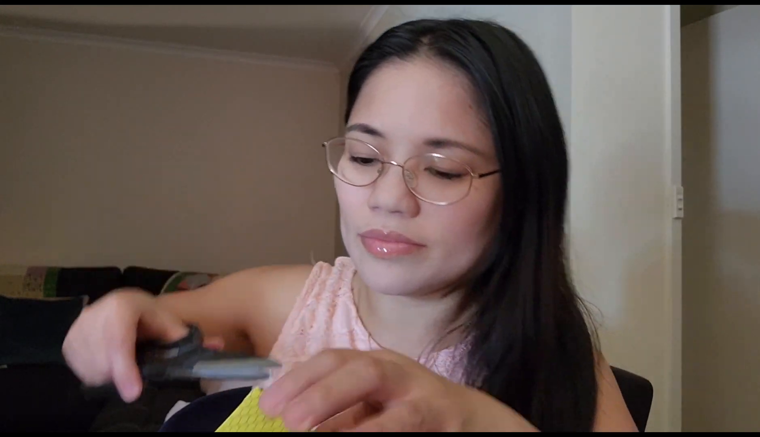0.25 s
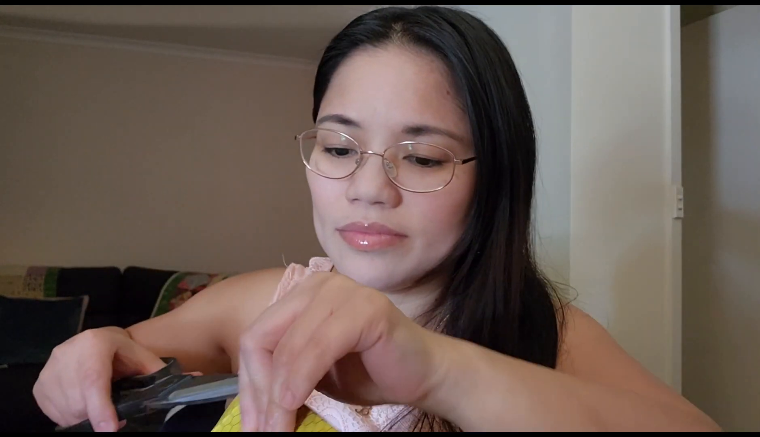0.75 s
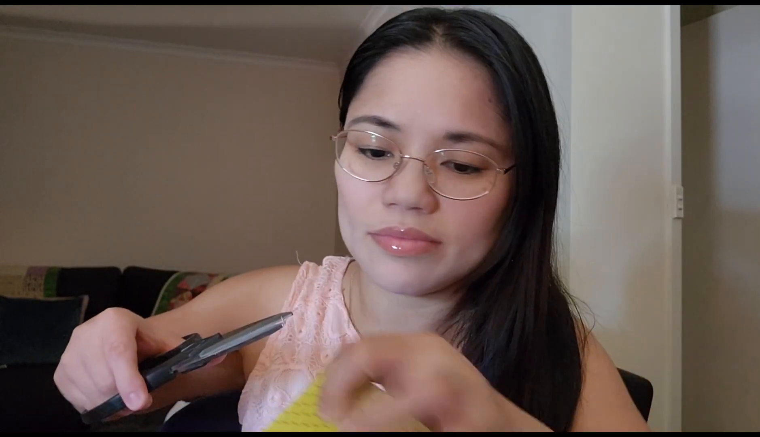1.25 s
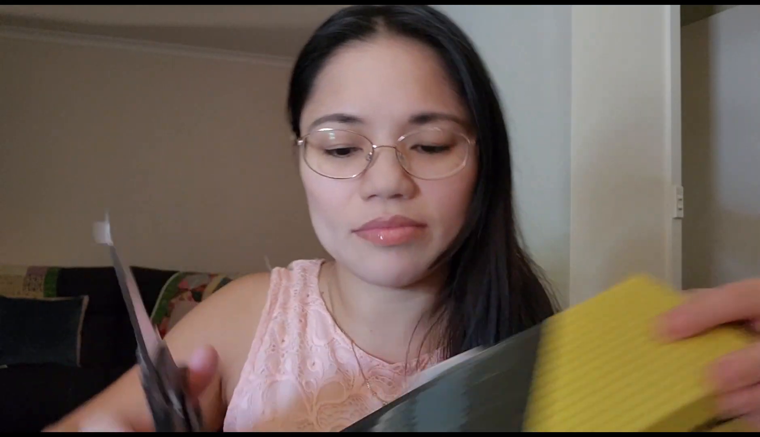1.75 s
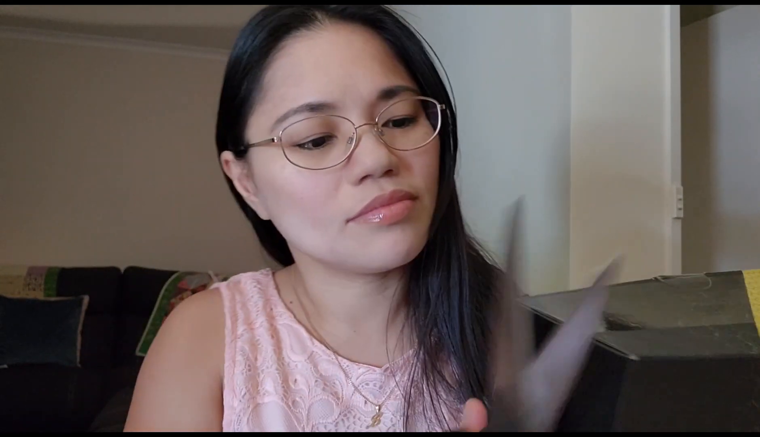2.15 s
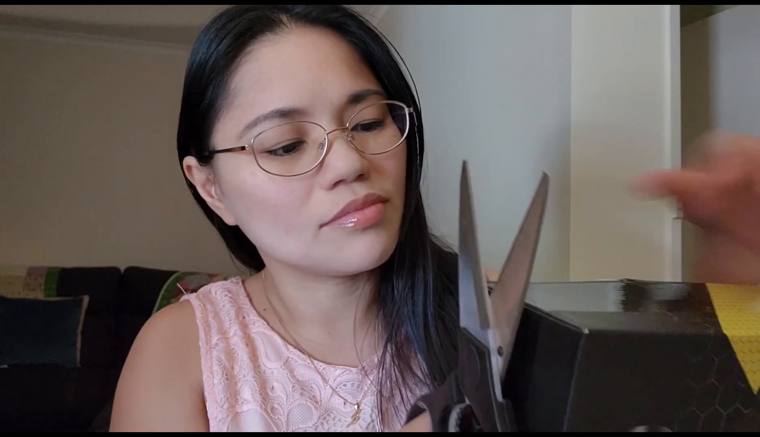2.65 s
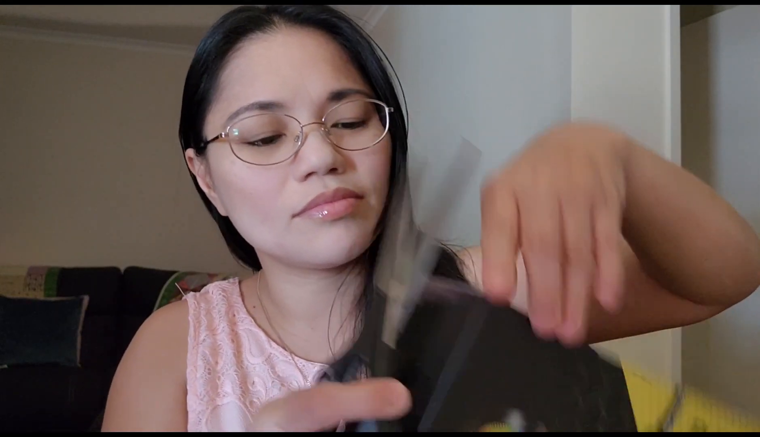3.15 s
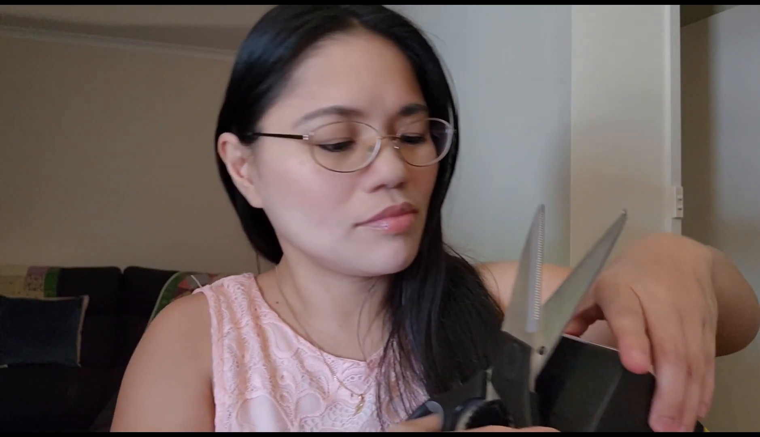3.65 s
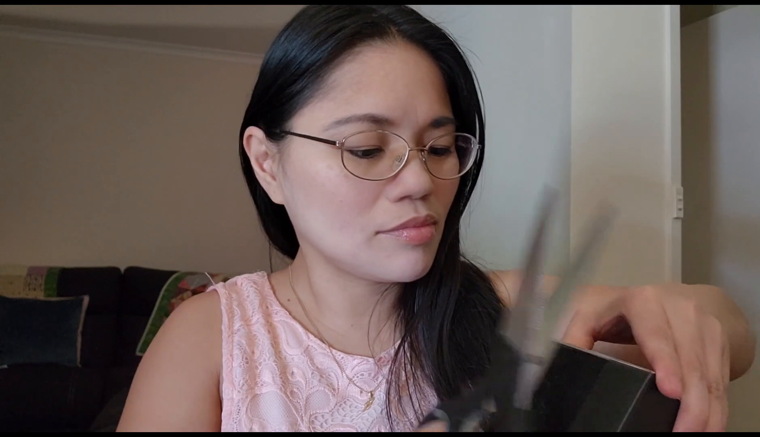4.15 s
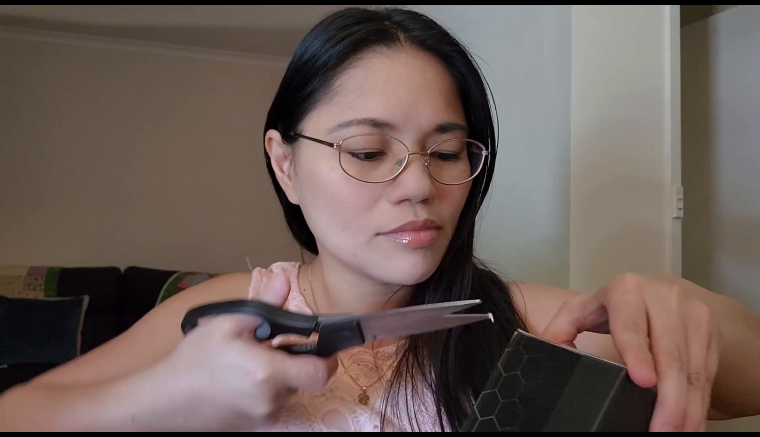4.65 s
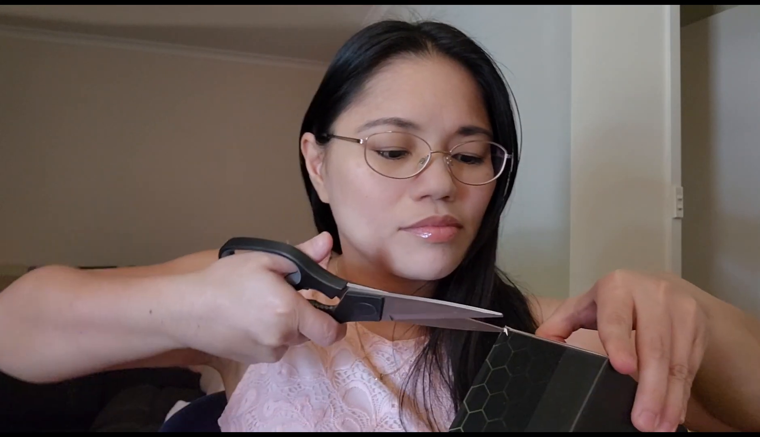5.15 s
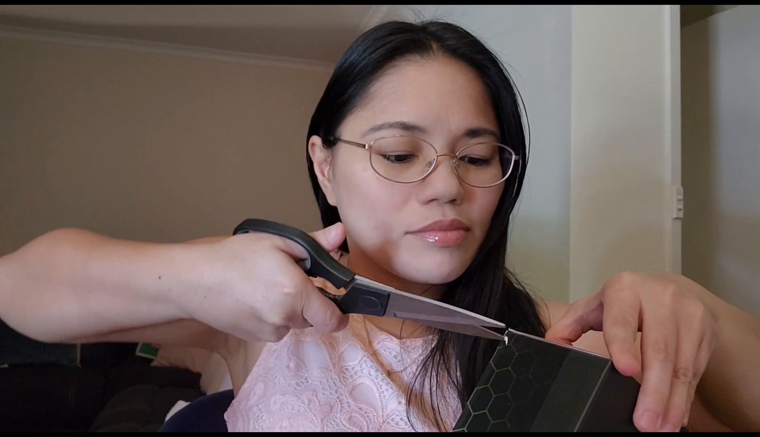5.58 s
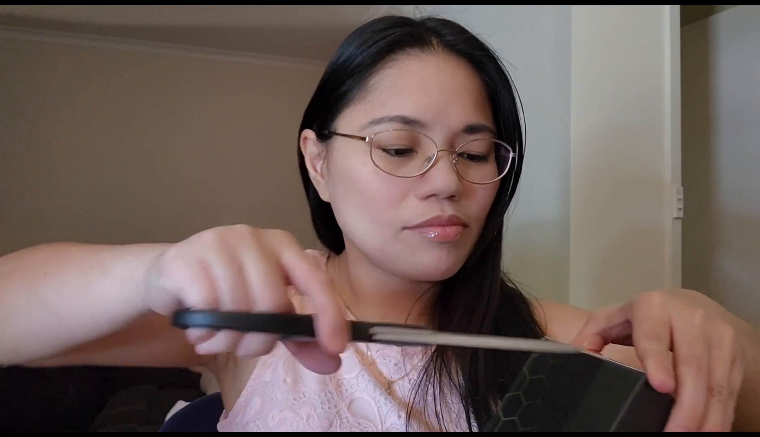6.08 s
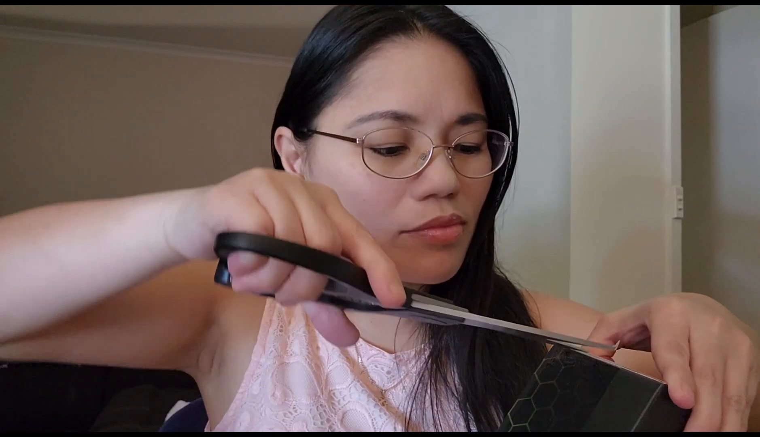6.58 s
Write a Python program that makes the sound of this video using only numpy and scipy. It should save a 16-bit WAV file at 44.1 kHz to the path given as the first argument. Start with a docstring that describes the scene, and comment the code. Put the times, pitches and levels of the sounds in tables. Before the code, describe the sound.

A close stereo microphone in a small, fairly dry room with steady soft noise. At 0 s blades grind faintly with a light tap; a hollow knock and tick come at 0.5, then low cardboard rubbing swells. At 1.3 a loud sharp snap of card and steel bursts out, the strongest hit. Quick rubs and papery hiss run from 1.5 to 2.2. At 2.25 the box lands with a hollow knock and bright metal tick; at 2.5 a deep table boom and rough skid, at 2.7 a shorter, weaker skid. Fingers slide and tap lightly until 3.3, thinning out, with small knocks and a faint blade scrape around 3.9 to 4.4. Then near quiet: soft dull knocks at 5.2 and 5.45, a faint rub at 6.0, barely audible ticks. Low rumble swells from about 5.2, strongest at the end.

```python
"""Scissors work at a taped cardboard box, close to the microphone in a small quiet room with steady noise.
First, blades grind and card rubs (grains through ringing modes); blows, damped sines with noise, snap a seam.
The box is turned, set down and shoved twice: steel ticks, the table booms and coarse slips make the skids.
Then fingers tap and slide on the card and the scissors look for the next seam.
Late on, a rumble of coloured noise swells; short echoes and a thin tail follow every near sound."""
import sys
import numpy as np
from scipy import signal
from scipy.fft import rfft, irfft
from scipy.io import wavfile
from scipy.ndimage import uniform_filter1d

SR = 44100
rng = np.random.default_rng(int(sys.argv[2]) if len(sys.argv) > 2 else 0)


def wav_record(signal):
    """Record a signal, one row per channel, as 16-bit PCM in the file named by sys.argv[1]."""
    frames = np.transpose(np.atleast_2d(signal))
    bounded = np.clip(frames, -1, 1)
    # unit amplitude maps onto the largest positive 16-bit level
    quanta = np.round(bounded * 32767).astype(np.int16)
    wavfile.write(sys.argv[1], SR, quanta)


N = 300806  # length in samples

# steady room noise with a shelf of hiss: f/Hz, relative density/dB per Hz
AIR_COLOUR = [(18, -11), (50, -4.5), (98, -19.5), (160, -14), (250, -12), (370, -16), (450, -16),
              (650, -27.5), (1400, -33), (2500, -37.5), (6000, -45.5), (8300, -44), (9200, -56.5),
              (15500, -54.5)]
# late low rumble: t/s, level/dB
RUMBLE_SWELL = [(0, -91.5), (4.898, -74.5), (5.399, -61), (6.3, -64.5), (6.55, -57), (6.82, -54)]
# spectrum of that rumble: f/Hz, relative density/dB per Hz
RUMBLE_COLOUR = [(20, -15.5), (42, 0), (58, 0), (90, -8.5), (135, -8), (260, -12), (500, -42.5),
                 (1200, -69)]
# likeness of left and right in the room noise: f/Hz, likeness/0-1
AIR_SAME = [(60, 0.6), (290, 0.9), (640, 0.4), (1400, 0), (15000, 0)]
# likeness of left and right in the rumble and the sliding sounds: f/Hz, likeness/0-1
NEAR_SAME = [(100, 1), (300, 0.98), (700, 0.097), (1500, 0.085), (3200, 0.13), (7000, 0.033)]
# card sliding under fingers and blades, one swell a stroke:
# start t/s, hardest t/s, end t/s, panel flexing level/dB, rub level/dB, hiss level/dB
STROKES = [(0.22, 0.3, 0.44, -77, -73, -71.5), (0.615, 0.674, 0.76, -66, -58.5, -78),
           (0.647, 0.763, 0.87, -56.5, -59.5, -90), (0.81, 1.032, 1.13, -60.5, -58, -70.5),
           (1.193, 1.255, 1.29, -55.5, -56.5, -75.5), (1.262, 1.3, 1.41, -47.5, -49, -57),
           (1.48, 1.644, 1.70, -58, -55, -68), (1.653, 1.753, 1.82, -55, -56.5, -55.5),
           (1.809, 1.83, 1.915, -51.5, -50.5, -57.5), (1.89, 1.937, 1.965, -64, -56, -57.5),
           (1.935, 1.987, 2.04, -51.5, -56.5, -66), (2.005, 2.053, 2.21, -63, -66.5, -64.5),
           (2.32, 2.398, 2.46, -54.5, -58.5, -69.5), (2.435, 2.48, 2.55, -65, -52, -55),
           (2.657, 2.665, 2.70, -55, -62, -61), (2.705, 2.756, 2.88, -66, -65.5, -70.5),
           (2.882, 2.94, 3.02, -68, -73, -67), (2.97, 3.068, 3.19, -65.5, -63.5, -65),
           (3.173, 3.174, 3.24, -59, -50, -66), (3.274, 3.328, 3.38, -60, -60, -71),
           (3.30, 3.42, 3.56, -71.5, -80, -75), (3.791, 3.847, 3.92, -74, -54.5, -76),
           (3.91, 4.002, 4.08, -70, -62.5, -61.5), (4.014, 4.052, 4.10, -78, -58.5, -61),
           (5.421, 5.652, 5.72, -79, -75, -80), (5.899, 6.03, 6.14, -67.5, -64, -98)]
# spectrum of the panels flexing: f/Hz, relative density/dB per Hz
FLEX_COLOUR = [(30, -18.5), (70, -1.5), (125, 4.5), (190, -4.5), (300, -26.5), (700, -52.5)]
# spectrum of the rub: f/Hz, relative density/dB per Hz
RUB_COLOUR = [(100, -37.5), (250, 0.5), (420, 2), (750, -9), (1600, -14), (2600, -17.5), (5000, -36.5),
              (12000, -59)]
# spectrum of the card's hiss: f/Hz, relative density/dB per Hz
HISS_COLOUR = [(500, -40), (1500, -1), (2500, -5), (3600, -2), (5500, -6.5), (6600, -11), (7900, -9.5),
               (9200, -18.5), (12000, -18), (15500, -22.5)]
# higher modes of the whole box: f/Hz, relative level/dB, t60/s
BOX_MODES = [(256, -6, 0.055), (440, -5.5, 0.046), (660, -15, 0.023), (790, -10, 0.025), (982, 0.5, 0.015),
             (1270, -10, 0.028), (1499, 1, 0.02), (1897, -4.5, 0.02), (2264, -9, 0.046), (2378, -8, .025),
             (3071, -21, .022), (3600, -14.5, 0.02), (3930, -15, 0.018), (4260, -19, 0.051),
             (5600, -20.5, .015)]
# how fast the room dies: f/Hz, t60/s
ROOM_DECAY = [(120, 0.48), (400, 0.45), (1200, 0.19), (4000, 0.22), (8000, .21), (15000, 0.037)]
# near echoes from table and body: delay t/s, gain/1
ECHOES = [(.0021, 0.19), (.0072, 0.13), (.0098, .1), (0.0128, 0.22)]
# blade slides on blade: start t/s, end t/s, level at the middle/dB
SHEARS = [(0.02, 0.132, -73.5), (3.964, 4.056, -73.5), (4.355, 4.405, -77)]
# scissor blade modes: f/Hz, relative level/dB
STEEL_MODES = [(3780, -2), (5650, -8), (6500, -9), (7280, -1), (7600, 2), (8270, -1.5), (9950, -14.5),
               (11250, -12.5), (12500, -11.5), (13800, -17.5)]
# blows on the box: t/s, pitch factor of the struck panel/1,
# thump level/dB, hollow body level/dB, clack level/dB, left over right/dB
KNOCKS = [(0.027, 1.2, -54, -74, -70.5, 4), (0.234, 0.85, -59.5, -61, -100, 0),
          (0.513, 1.02, -54.5, -42.5, -58, 3), (1.2899, 1.24, -40.5, -28, -26, 2.5),
          (1.635, 1.05, -76, -55.5, -58, 3), (1.668, 1.16, -59.5, -60.5, -63, 3),
          (1.75, 1.01, -74, -46, -54.5, 1), (2.2512, 1.005, -40, -26, -39, 1),
          (2.4575, 1.2, -46.5, -52.5, -57.5, 1), (2.4992, 0.8, -34.5, -35, -44.5, 0.5),
          (2.505, 0.97, -35.5, -47.5, -53, -4), (2.621, 1.23, -69, -56, -71.5, -4),
          (2.701, 1, -53, -50, -44.5, -1), (3.1553, 0.993, -52.5, -45, -54, -0.5),
          (3.206, 1.5, -52, -54.5, -58, -0.5), (3.276, 0.89, -53, -47.5, -59, 0.5),
          (3.914, 1.286, -49.5, -44, -47.5, -0.5), (3.9175, 1.58, -67, -47, -55, 10),
          (5.175, 1.68, -47, -49, -68.5, 1.5), (5.454, 1.02, -51.5, -47.5, -75, 1.5)]
# lowest modes of a panel, before the pitch factor: f/Hz, relative level/dB, t60/s
PANEL_MODES = [(124, -2.5, 0.07), (242.6, -5, 0.036), (295, -7.5, .04), (352, -1.5, 0.035),
               (540, -2.5, 0.039)]
# steel blades ticking: t/s, peak level before the left side is raised/dB
CLINKS = [(0.513, -43.5), (0.995, -51.5), (1.126, -59), (1.2902, -15.5), (2.2536, -18.5), (2.262, -37),
          (2.653, -53), (2.925, -57), (3.006, -55), (3.153, -49), (3.559, -56), (4.154, -57), (4.368, -50),
          (5.513, -64.5), (6.445, -67), (6.70, -64.5)]
# the table under the box answers a shove: t/s, level/dB
THUDS = [(2.248, -36), (2.385, -47), (2.411, -48), (2.504, -25), (2.699, -42.5)]
# table modes: f/Hz, relative level/dB, t60/s
TABLE_MODES = [(57.7, -7.5, 0.27), (77, 0, 0.034), (113.4, 2, .06)]
# the box skids under growing force until it stops:
# start t/s, hardest t/s, level at the hardest/dB, rise from the start/dB, fall time constant t/s
SKIDS = [(2.469, 2.497, -32.5, 44, 0.011), (2.64, 2.701, -35.5, 32.5, 0.01)]

AIR_DB = -64  # steady room noise
EDGE_DB, SWELL_POWER = 15.5, 1.5  # a stroke is this far down at start and end; the power rounds its top
# the hands never lie quite still while they turn the box: flexing, rub and hiss levels (dB)
HOLD_UNTIL_S, HOLD_DB = 4.15, (-75, -78.5, -81.5)
STEEL_T60 = .014  # s; hand and card damp all blade modes at once
# a blow with a clack of FIRM_DB touches for CONTACT_S; the touch doubles for every DOUBLING_DB below that
CONTACT_S, FIRM_DB, DOUBLING_DB = 0.00049, -40, 13.5
CRACK_DB = -16.5  # crack of the fibres, relative to the clack
MIC_LOW_HZ, EDGE_HZ = 29.8, 15500


def amp(db):
    """Decibels to gain."""
    return 10 ** (np.asarray(db) / 20)


def evened(x):
    """Scales to rms 1."""
    return x / np.sqrt(np.mean(x ** 2) + 1e-20)


def read(points, hz):
    """Reads a table on a log-frequency axis."""
    f, value = np.transpose(points)
    return np.interp(np.log(hz + 1), np.log(f + 1), value)


def add(mix, s, sound):
    """Adds a stereo sound at time s."""
    part = mix[:, max(round(s * SR), 0):][:, :sound.shape[1]]
    part += sound[:, :part.shape[1]]


def coloured(x, colour, same):
    """Gives a pair of signals a spectrum and a left-right likeness, at rms 1."""
    hz = np.fft.rfftfreq(N, 1 / SR)
    left, other = rfft(x)
    likeness = np.clip(read(same, hz), 0, 1)
    right = likeness * left + np.sqrt(1 - likeness ** 2) * other
    return evened(irfft(np.array([left, right]) * amp(read(colour, hz)), N))


def ring(modes, t):
    """Damped sines of a struck thing."""
    return sum(amp(db - 60 * t / t60) * np.sin(2 * np.pi * hz * t) for hz, db, t60 in modes)


def air():
    """Steady room noise and a slow late swell of rumble, both coloured noise."""
    steady = amp(AIR_DB) * coloured(rng.standard_normal((2, N)), AIR_COLOUR, AIR_SAME)
    swell = amp(np.interp(np.arange(N) / SR, *np.transpose(RUMBLE_SWELL)))
    return steady + swell * coloured(rng.standard_normal((2, N)), RUMBLE_COLOUR, NEAR_SAME)


def grains(per_s, spread_db):
    """Fibres catching and slipping: clicks of very uneven size, timed alike left and right."""
    size = amp(spread_db * np.minimum(rng.exponential(1, N), 4))
    fires = rng.random(N) < per_s / SR
    return size * fires * rng.standard_normal((2, N))


def through_box(x, share):
    """Part of a friction sound rings the box modes."""
    response = ring(BOX_MODES, np.arange(4096) / SR)
    body = signal.oaconvolve(x, response[None], axes=1)[:, :N]
    return evened(x) + share * evened(body)


def patchy(x, depth_db, wide=5, long=13):
    """As the contact point wanders, some resonances of the card swell and others fade."""
    z = signal.stft(x, SR, nperseg=512, noverlap=384)[2]
    drift = rng.standard_normal(z.shape[1:])
    for _ in range(2):
        drift = uniform_filter1d(drift, round(wide), 0)  # across frequency bins
        drift = uniform_filter1d(drift, round(long), 1)  # across time frames
    return signal.istft(z * amp(depth_db * evened(drift)), SR, nperseg=512, noverlap=384)[1][:, :N]


def strokes():
    """Sliding contact swells and eases: panels flex, the box hums with the rub, the coated card hisses."""
    t = np.arange(N) / SR
    flex = coloured(grains(600, 1.5), FLEX_COLOUR, NEAR_SAME)
    rub = patchy(through_box(grains(4400, 1.6), 0.098), depth_db=3.5, wide=3)
    rub = coloured(rub, RUB_COLOUR, NEAR_SAME)
    grit = evened(grains(6000, 2.1)) + .45 * evened(grains(130, 2.5))  # now and then an edge catches
    hiss = patchy(through_box(grit, 0.25), depth_db=3.5, wide=5)
    hiss = coloured(hiss, HISS_COLOUR, NEAR_SAME)

    hold = np.clip((HOLD_UNTIL_S - t) / 0.12, 0, 1)
    power = np.outer(amp(HOLD_DB) ** 2, hold)
    for start, top, end, *levels_db in STROKES:
        away = np.maximum((top - t) / (top - start), (t - top) / (end - top))  # 0 at the top, 1 at the ends
        on = away < 2
        swell = amp(-EDGE_DB * away[on] ** SWELL_POWER)
        power[:, on] += np.outer(amp(levels_db), swell) ** 2
    return sum(level * layer for level, layer in zip(np.sqrt(power), (flex, rub, hiss)))


def room(x, wet_db=-18.0, build_s=0.0066, side_s=.0003, size=22000):
    """A few near echoes and a thin diffuse tail in which each band dies at its own speed."""
    taps = rng.standard_normal((2, size)) * (rng.random((2, size)) < 4000 / SR)
    hz, t, z = signal.stft(taps, SR, nperseg=256)
    decay = amp(-60 * t / read(ROOM_DECAY, hz)[:, None])
    tail = signal.istft(z * decay, SR, nperseg=256)[1]
    tail *= np.clip(np.arange(tail.shape[1]) / SR / build_s - .5, 0, 1)
    tail *= amp(wet_db) / np.linalg.norm(tail[0])
    for delay, gain in ECHOES:  # the right side hears each echo side_s later
        tail[[0, 1], [round(delay * SR), round((delay + side_s) * SR)]] += gain
    return signal.fftconvolve(x, tail, axes=1)[:, :N]


def blade(t):
    """The brief ring of the steel: damped sines with one shared decay."""
    return ring([(hz, db, STEEL_T60) for hz, db in STEEL_MODES], t)


def shears():
    """Edge grinds along edge: a stream of grains keeps the steel sounding."""
    t = np.arange(N) / SR
    response = blade(np.arange(2048) / SR)
    steel = evened(signal.oaconvolve(grains(5800, 1.3), response[None], axes=1)[:, :N])
    level = np.zeros(N)
    for start, end, db in SHEARS:
        along = np.clip((t - start) / (end - start), 0, 1)
        level += amp(db) * np.sqrt(abs(np.sin(np.pi * along)))
    return steel * level


def weighted(sound, levels_db, size=8192):
    """Where and how hard a blow lands sets its strength in four registers; the filter is causal."""
    edges = np.array([70, 220, 700, 2600, 15000])  # Hz
    centres = np.sqrt(edges[:-1] * edges[1:])
    hz, z = abs(np.fft.fftfreq(size, 1 / SR)), np.fft.fft(sound, size)
    power = (abs(z) ** 2).mean(0) / size / (.02 * SR)  # energy as if spread over 20 ms
    own_db = [10 * np.log10(power[(hz >= lo) & (hz < hi)].sum()) for lo, hi in zip(edges, edges[1:])]
    log_gain = read(np.c_[centres, np.log(amp(levels_db - np.array(own_db)))], hz)
    minimum_phase = np.exp(np.conj(signal.hilbert(log_gain)))
    return np.fft.ifft(z * minimum_phase).real


def knocks(crack=1.0, crumple=.13, crumple_s=0.0088, lag_s=0.000092, low_hz=110, hard_hz=15000,
           soft_s=.0012, reach=.6):
    """Each blow rings panel and box, the left side first, while crushed fibres crackle as shaped noise."""
    out, t = np.zeros((2, N)), np.arange(6000) / SR
    # a small box moves little air in the bass
    radiated = signal.butter(2, low_hz, "high", fs=SR, output="sos")
    for s, pitch, thump_db, hollow_db, clack_db, pan_db in KNOCKS:
        contact_s = CONTACT_S * 2 ** ((FIRM_DB - clack_db) / DOUBLING_DB)
        modes = [(hz * pitch, db, t60) for hz, db, t60 in PANEL_MODES] + list(BOX_MODES)
        # soft contacts miss the quick modes, build up slowly and sound duller
        modes = [(hz, db - 10 * np.log10(1 + (hz * contact_s / reach) ** 4), t60) for hz, db, t60 in modes]
        press = 1 - np.exp(-t / contact_s)
        body = press * np.array([ring(modes, t), ring(modes, np.maximum(t - lag_s, 0))])
        snap = crack * np.exp(-t / (contact_s + 0.0019))
        force = press * (snap + crumple * np.exp(-t / crumple_s))
        top_hz = np.clip(hard_hz / (1 + contact_s / soft_s), 3000, 20000)
        band = signal.butter(2, [1100, top_hz], "band", fs=SR, output="sos")
        fibres = signal.sosfilt(band, force * rng.standard_normal((2, len(t))))
        levels_db = np.array([thump_db, hollow_db, clack_db, clack_db + CRACK_DB])
        blow = weighted(signal.sosfilt(radiated, body + fibres), levels_db)
        add(out, s, blow * amp([[pan_db / 2], [-pan_db / 2]]))
    return out


def clinks(chatter_s=0.00083, dry=0.64, box_share=.5, left_db=4.5):
    """Steel meets steel or card: a brief noise chatter rings the blades and the box."""
    out, t = np.zeros((2, N)), np.arange(3000) / SR
    panels = signal.sosfilt(signal.butter(2, 1900, "high", fs=SR, output="sos"), ring(BOX_MODES, t))
    answer = evened(blade(t)) + box_share * evened(panels)
    for s, db in CLINKS:
        chatter = rng.standard_normal((2, len(t))) * np.exp(-t / chatter_s)
        ringing = signal.fftconvolve(chatter, answer[None], axes=1)[:, :len(t)]
        sound = evened(ringing) + dry * evened(chatter)
        add(out, s, amp(db) * sound / abs(sound).max() * amp([[left_db], [0]]))
    return out


def thuds(press_s=0.00169):
    """The table top booms briefly in damped sines, alike on both sides."""
    out, t = np.zeros((2, N)), np.arange(8000) / SR
    boom = ring(TABLE_MODES, t) * (1 - np.exp(-t / press_s))
    for s, db in THUDS:
        add(out, s, amp(db) * np.array([boom, boom]))
    return out


def skids():
    """Coarse slips grow with the force and die when the box comes to rest."""
    t = np.arange(N) / SR
    force = np.zeros(N)
    for start, top, db, rise_db, fall in SKIDS:
        rise = amp(db - rise_db * np.clip((top - t) / (top - start), 0, 2))
        force += rise * (t > start) * np.exp(-np.maximum(t - top, 0) / fall)
    slips = patchy(through_box(grains(3500, 2.2), 0.3), depth_db=2.5, wide=4)
    return force * coloured(slips, SKID_COLOUR, NEAR_SAME)


# spectrum of the skids: f/Hz, relative density/dB per Hz
SKID_COLOUR = [(60, -18), (150, -9.5), (400, 6), (800, -18), (1450, -4), (2600, -16.5), (5000, -12),
               (7000, -25.5), (9500, -25.5), (12000, -18.5), (15500, -21)]


def scene():
    """Box, table and scissors, the room's answer to them, and the air."""
    near = strokes() + shears() + knocks() + clinks() + thuds() + skids()
    return near + room(near) + air()


def record(dry):
    """The microphone loses the deepest bass; then the recorder's band limit."""
    heard = signal.sosfilt(signal.butter(2, MIC_LOW_HZ, "high", fs=SR, output="sos"), dry)
    band_limit = signal.firwin(201, EDGE_HZ, window=("kaiser", 8), fs=SR)
    return signal.oaconvolve(heard, band_limit[None], "same")


dry = scene()
out = record(dry)
wav_record(out)
```